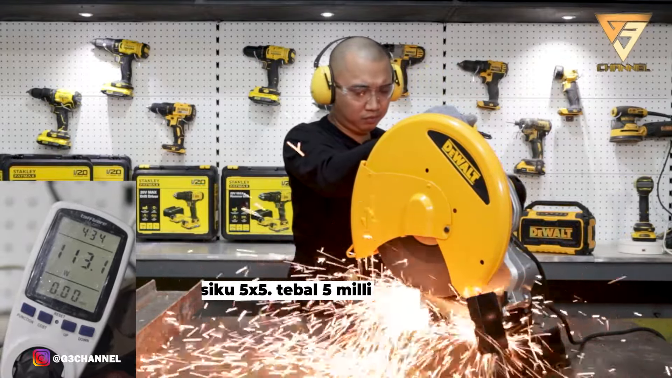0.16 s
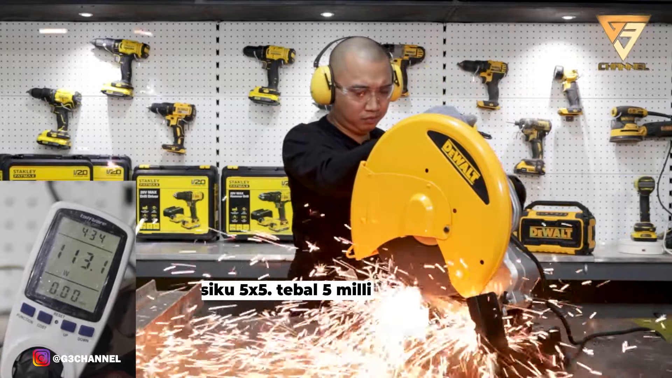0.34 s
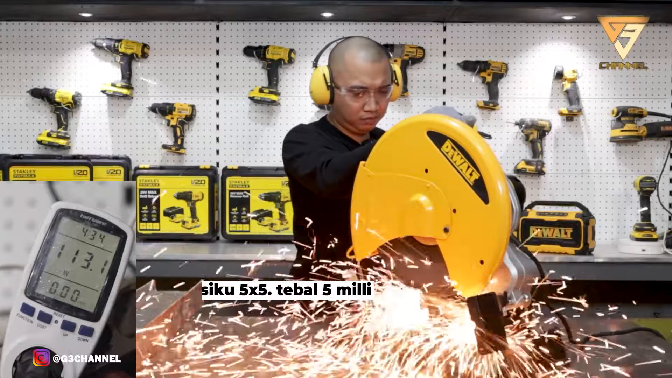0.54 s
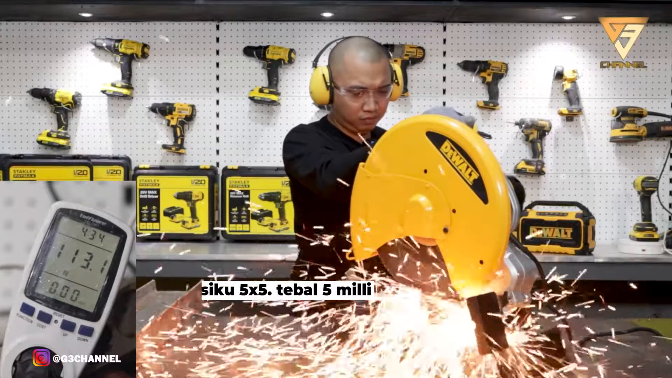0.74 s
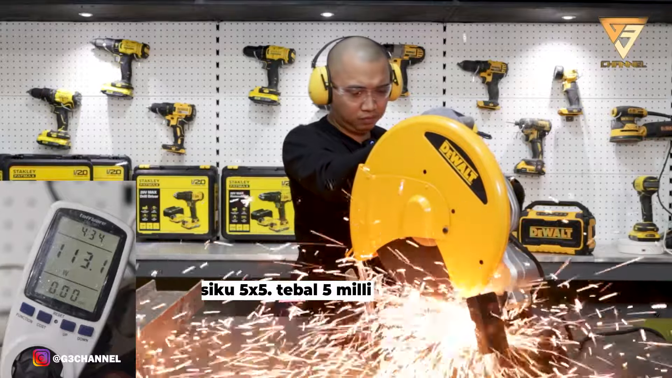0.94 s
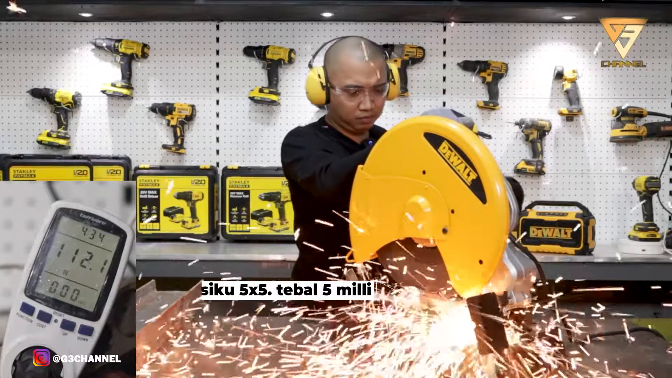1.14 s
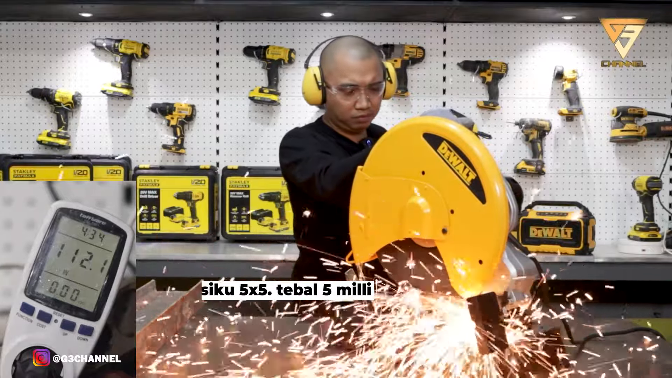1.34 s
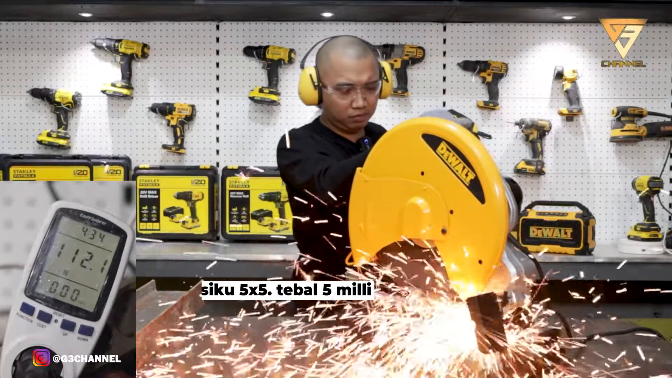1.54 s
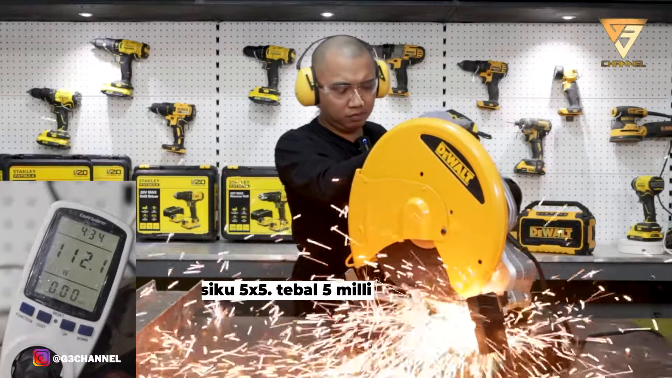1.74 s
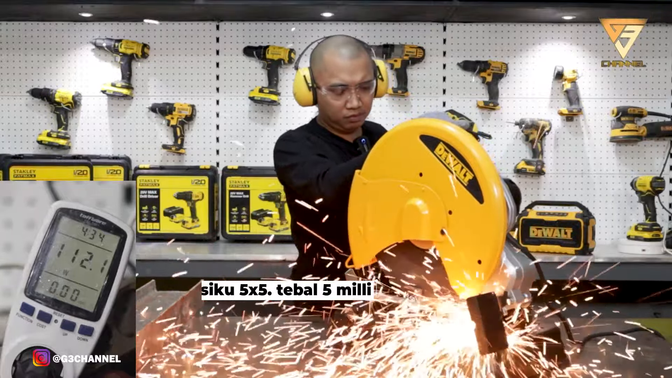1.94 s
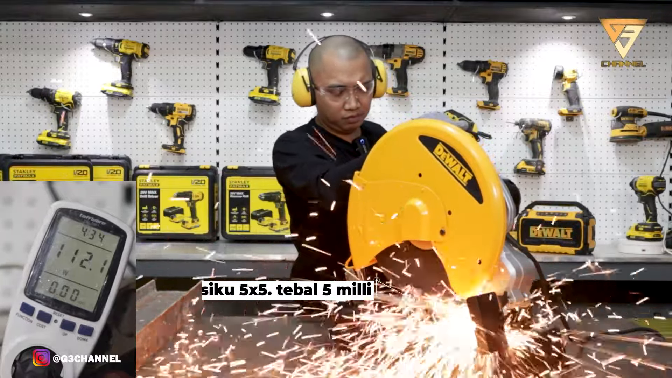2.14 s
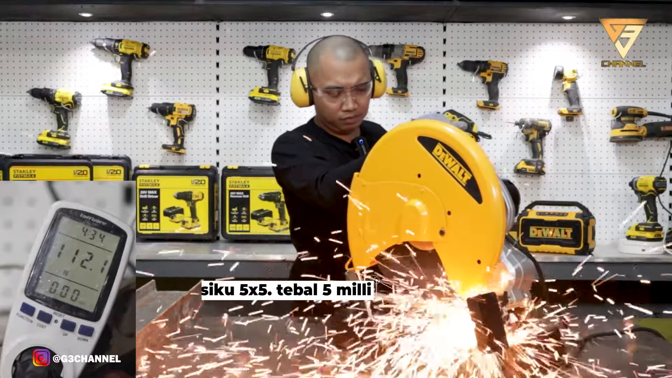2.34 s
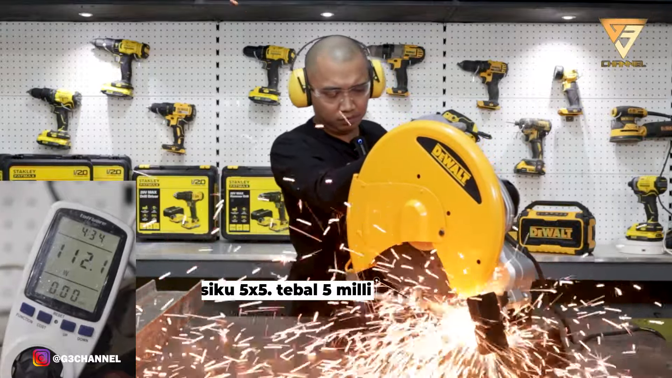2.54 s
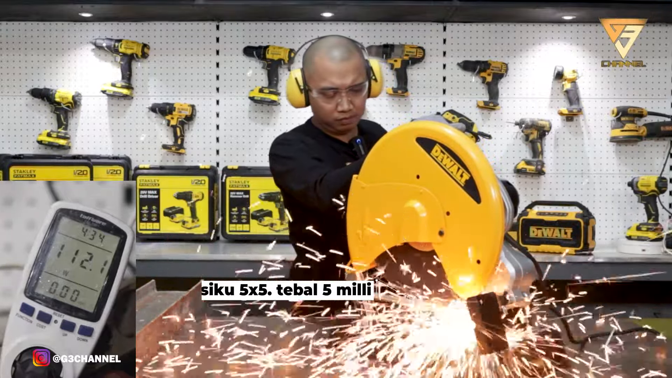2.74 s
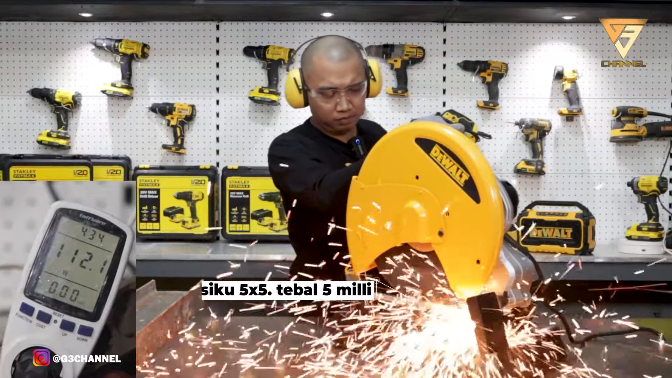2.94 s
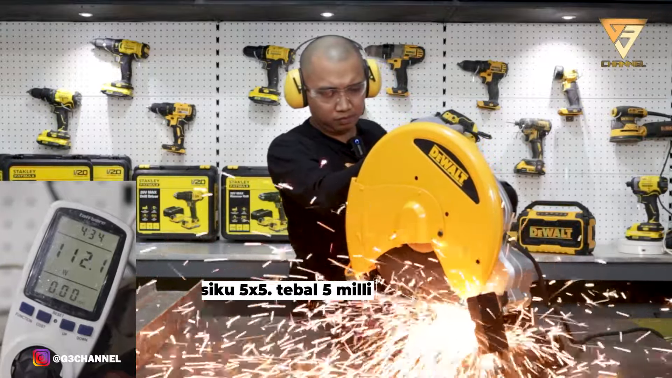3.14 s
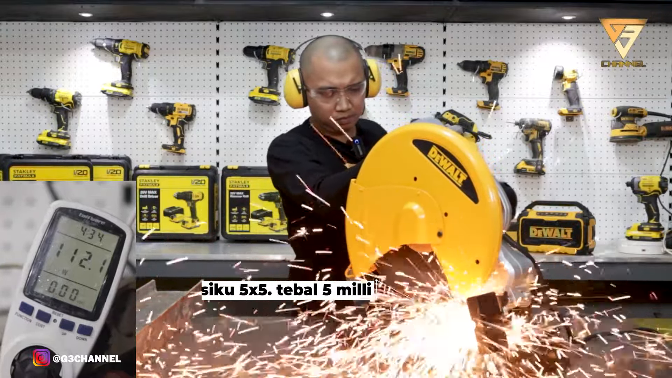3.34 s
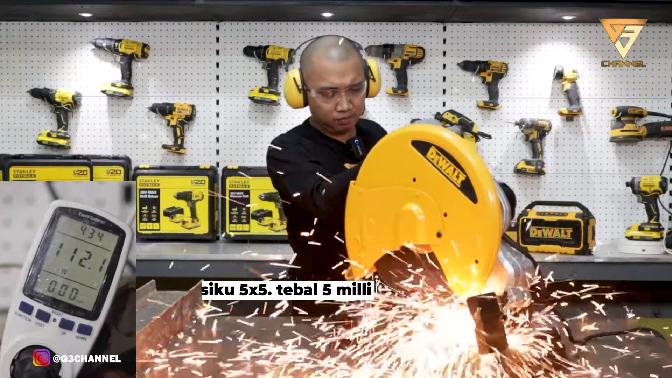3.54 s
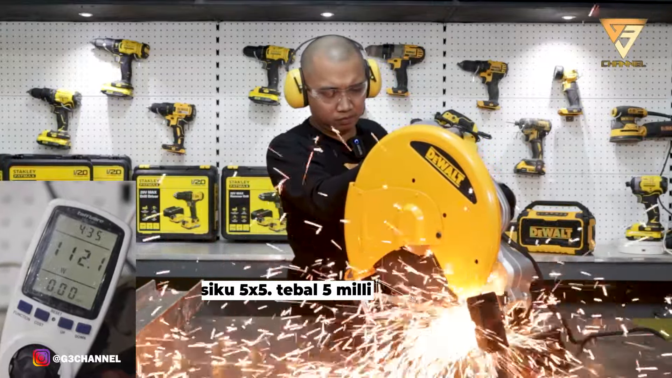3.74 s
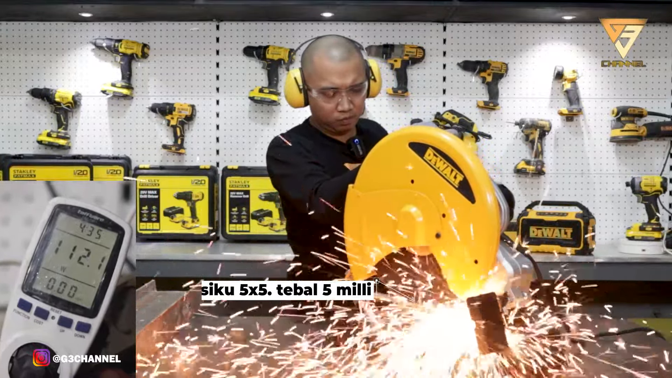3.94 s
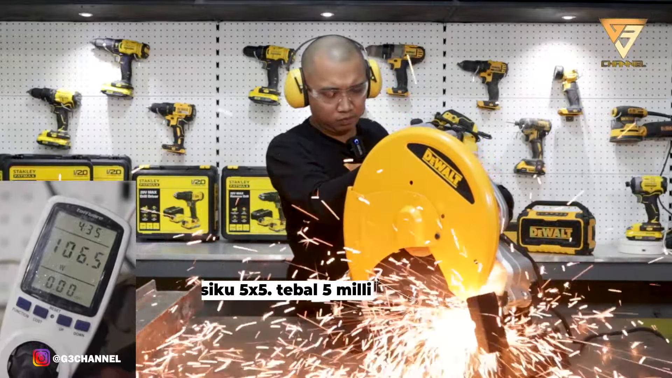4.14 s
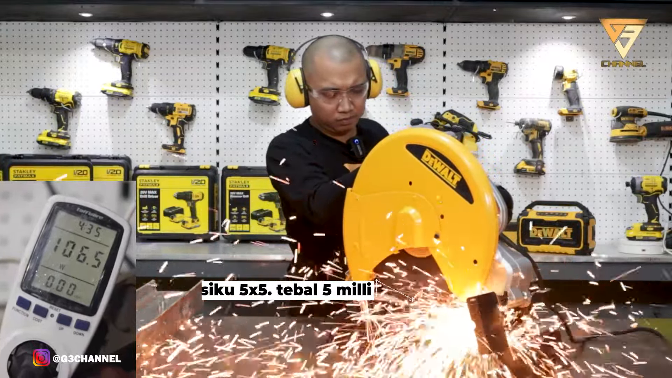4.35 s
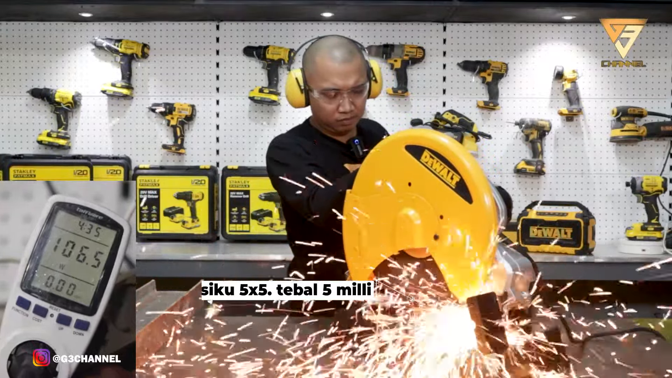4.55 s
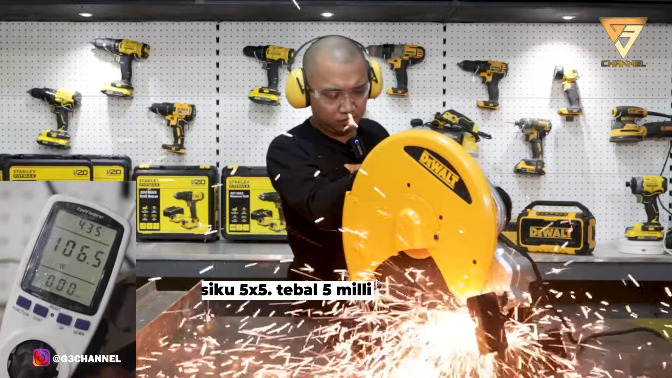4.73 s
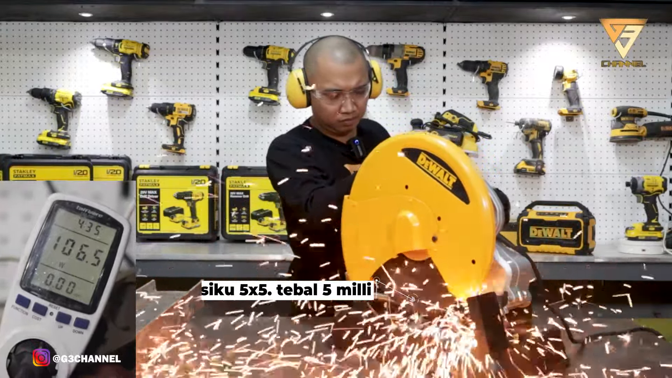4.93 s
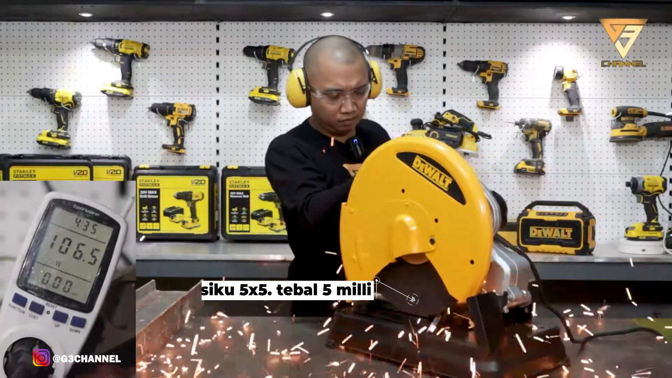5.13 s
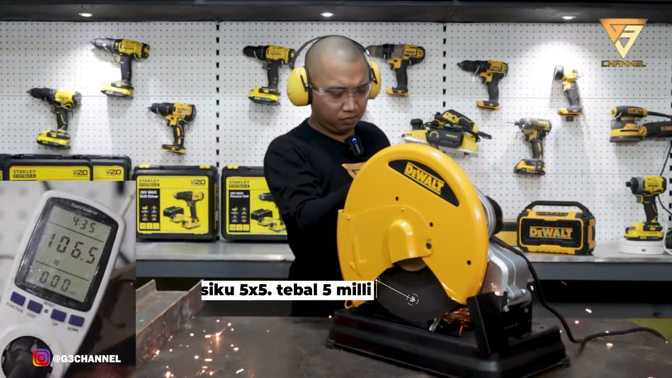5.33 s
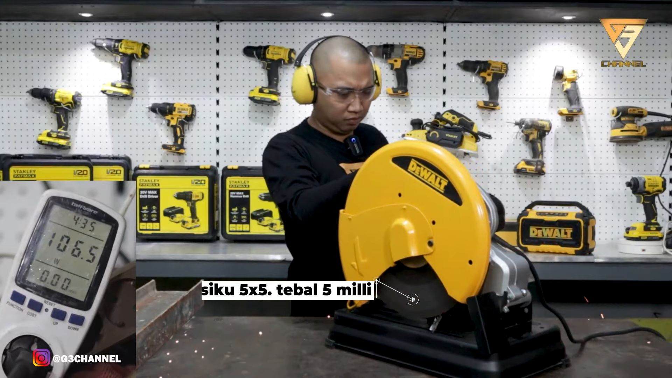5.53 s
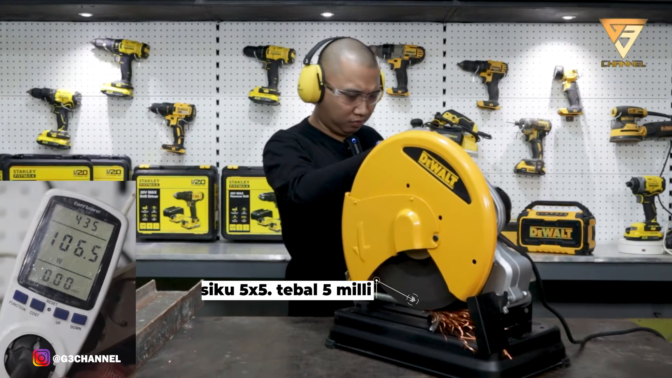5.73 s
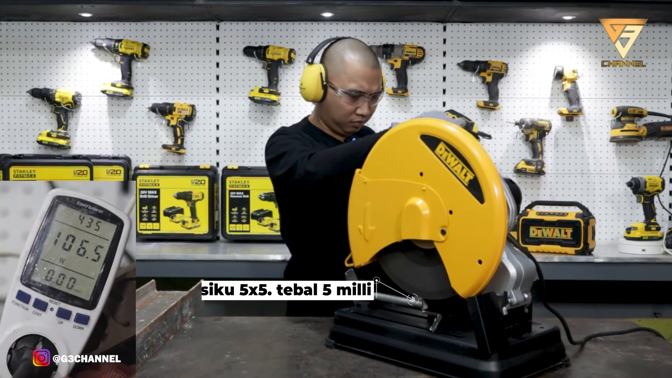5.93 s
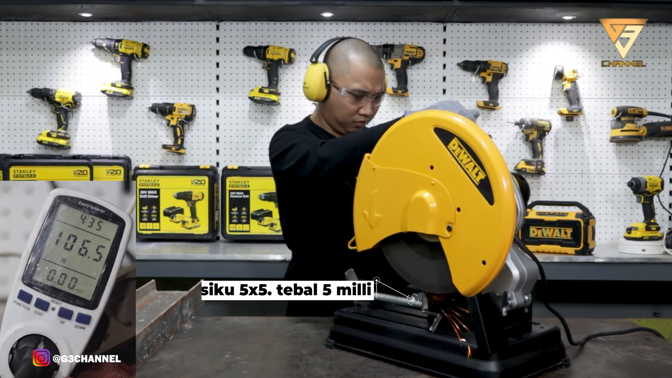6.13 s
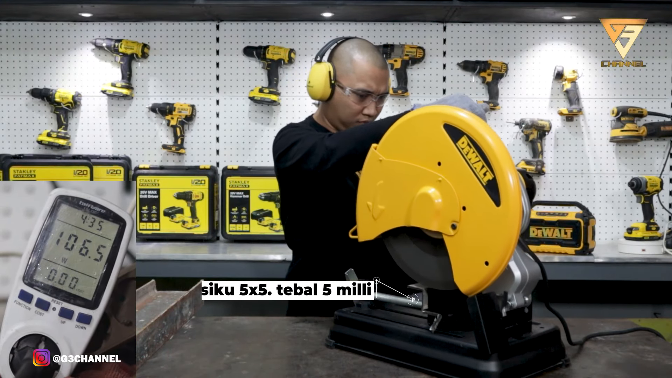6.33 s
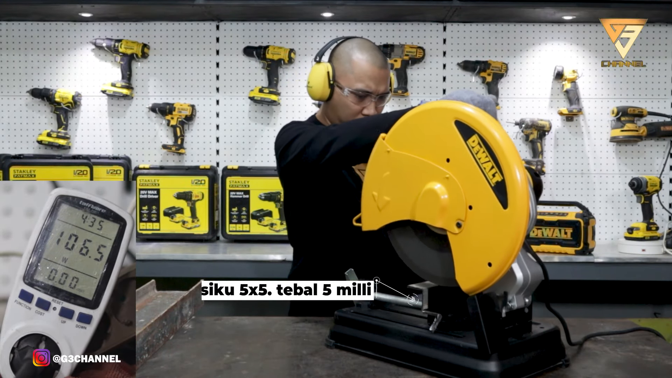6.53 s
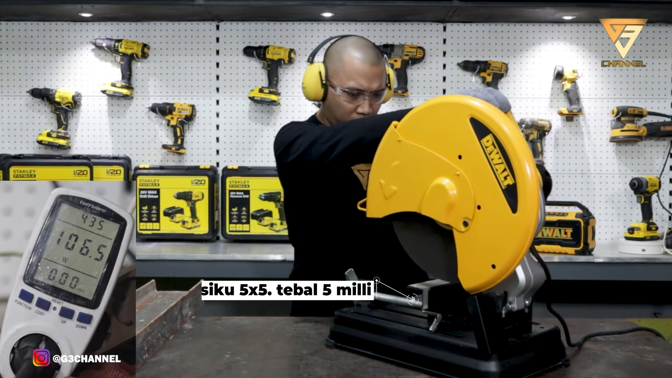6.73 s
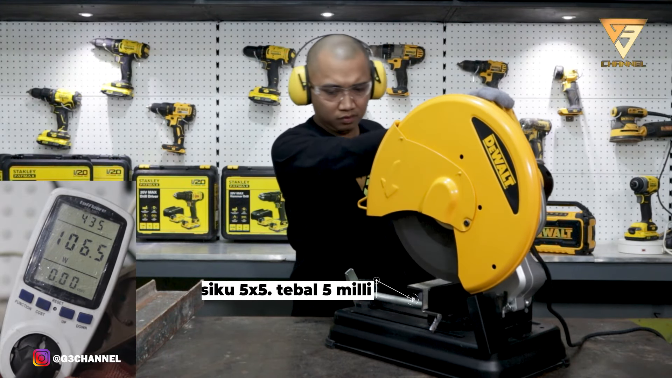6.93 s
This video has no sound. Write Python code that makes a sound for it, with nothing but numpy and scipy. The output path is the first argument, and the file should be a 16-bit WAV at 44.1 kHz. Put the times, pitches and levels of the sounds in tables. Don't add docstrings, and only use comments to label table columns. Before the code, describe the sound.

From 0 s, a chop saw is already in full cut through steel angle, loud and close in a workshop. A dense, abrasive screech with bright spark hiss throbs rapidly with each wheel turn, over a motor roar and low hum. Metallic squeals and ringing tones come and go, and the pitch rises slightly until about 3 s, then sags under load. Near 5.0 s the wheel breaks through and the grinding collapses abruptly; the motor speeds up. From about 5.25 to 6.3 s the wheel's sides scrape the cut in a fast, fluttering, bright rasp with short steel rings, strongest around 5.6 s. The motor is switched off at about 5.75 s. Scraping thins and ends with two tiny bright grazes near 6.33 s. The fan's airy whir and thin brush whine keep sinking in pitch to 7 s without stopping.

```python
import sys
import numpy as np
from scipy import signal
from scipy.fft import rfft, irfft, next_fast_len
from scipy.io import wavfile
from scipy.ndimage import uniform_filter1d

SR = 44100
rng = np.random.default_rng(int(sys.argv[2]) if len(sys.argv) > 2 else 0)


def convert_level_to_amplitude(level_db):
    exponent = np.asarray(level_db, float) / 20
    return 10 ** exponent


def store_wav(level_fs):
    pcm = np.round(np.clip(np.atleast_2d(level_fs), -1, 1) * 32767)
    wavfile.write(sys.argv[1], SR, pcm.T.astype(np.int16))


N = 307804
TIME_S = np.arange(N) / SR
BREAK_S, SWITCH_OFF_S = 5.0, 5.75


def curve(rows, before=None, after=None):
    s, *columns = np.transpose(rows)
    return [np.interp(TIME_S, s, column, left=before, right=after) for column in columns]


def unit(x):
    return x / np.sqrt(np.mean(x ** 2) + 1e-20)


def colour(x, points):
    hz, db = np.transpose(points)
    size = next_fast_len(len(x))
    grid = np.fft.rfftfreq(size, 1 / SR) + 1
    gain = convert_level_to_amplitude(np.interp(np.log(grid), np.log(hz), db))
    return irfft(rfft(x, size) * gain, size)[:len(x)]


def band(x, low_hz, high_hz):
    edges = [low_hz, min(high_hz, .45 * SR)]
    return signal.sosfilt(signal.butter(3, edges, "band", fs=SR, output="sos"), x)


def resonance(x, hz, width):
    r = np.exp(-np.pi * width / SR)
    feedback = [1, -2 * r * np.cos(2 * np.pi * hz / SR), r * r]
    return signal.lfilter([(1 - r * r) / 2, 0, (r * r - 1) / 2], feedback, x)


def with_modes(x, modes):
    return x + sum(convert_level_to_amplitude(db) * resonance(x, hz, width) for hz, width, db in modes)


def drift(rate, size=N):
    knots = rng.standard_normal(1500)
    return np.interp(np.arange(size) / SR * rate, np.arange(1500), knots)


def cosine(cycles):
    return np.cos(2 * np.pi * cycles)


# t/s, turns per second f/Hz
LOADED_SPEED = [(0, 46.05), (.5, 46.1), (.72, 46.68), (1.2, 46.75), (1.5, 47.55), (1.9, 47.55),
                (2.25, 48.0), (2.55, 48.1), (3.12, 48.92), (3.75, 47.97), (3.97, 47.97), (4.15, 47.15),
                (4.4, 46.73), (4.97, 46.58), (5.3, 50), (5.57, 51.5), (5.75, 49.78)]


def wheel_speed():
    drag_per_s = .306
    coasting_s = np.clip(TIME_S - SWITCH_OFF_S, 0, None)
    return curve(LOADED_SPEED)[0] / (1 + drag_per_s * coasting_s)


def wheel_turns():
    return np.cumsum(wheel_speed()) / SR


# t/s, once a turn level/dB, twice a turn level/dB
RUNOUT = [
    (0, 0.5, 3.5),
    (1, 0, 1),
    (1.5, 1, 1.5),
    (2.25, 2, -0.5),
    (3, 3, 2.5),
    (3.5, 1.3, 2),
    (4, 1.7, 1),
    (4.6, 2, 2),
    (4.95, 1, 3),
    (5.05, 2.5, -2),
]
# t/s, grinding level/dB, how freely the steel rings level/dB
FEED = [(0, -17, 3.5), (.5, -17, 3), (.75, -17.5, 3), (.9, -17, -1), (1.3, -17, -1), (1.75, -16, -1),
        (2.3, -16, -2), (3.1, -16, -3), (3.72, -16, -2.5), (3.82, -17.5, -1.5), (4.05, -16.5, 0.5),
        (4.5, -18.5, 3.5), (5.018, -16, 1.5), (5.054, -22, 3), (5.126, -20, -9), (5.25, -26, -6)]
# f/Hz, width f/Hz, level/dB
STEEL_MODES = [(4400, 160, -14), (6950, 210, -8), (8650, 800, -4.5), (9540, 200, -0.5), (10330, 230, 1),
               (11500, 300, -9.5), (12660, 260, -12)]
# f/Hz, level/dB per Hz
GRIND_COLOUR = [(88, -53), (150, -31), (296, -11), (552, -3), (632, -12), (724, 3), (1030, -2),
                (1770, -3.5), (2240, -9), (2460, -3), (3170, -9.5), (5800, -10.5), (8720, -1),
                (12900, -2.5), (15600, -5.5)]


def grinding(turns):
    once_db, twice_db = curve(RUNOUT)
    skewed_turns = turns + .04 * cosine(2 * turns - .09)
    throb_db = once_db * cosine(turns - .06) + twice_db * cosine(2 * skewed_turns - .09)
    turns = turns + .00006 * drift(20)
    grit = cutting_noise(turns)
    body = colour(with_modes(grit, STEEL_MODES), GRIND_COLOUR)

    def part(low_hz, high_hz):
        level = np.std(band(body, max(low_hz, 1000), high_hz))
        return band(body, low_hz, high_hz) / level

    high_db, ring_db = curve(FEED, after=-90)
    low_db = high_db - 8.5 + 0.56 * ring_db - 1.1 * TIME_S
    low_mid_db = high_db - 10.0 + ring_db
    mid_db = high_db - 9.5 + 0.39 * ring_db + 0.1 * TIME_S
    low = convert_level_to_amplitude(low_db - 2.5 + 0.25 * throb_db) * part(152, 1870)
    low_mid = convert_level_to_amplitude(low_mid_db - 0.5 + 0.23 * throb_db) * part(2050, 3800)
    mid = convert_level_to_amplitude(mid_db + 1.27 + 0.27 * throb_db) * part(4190, 7060)
    high = convert_level_to_amplitude(high_db - 1.7 + throb_db) * part(6620, 14060)
    tones = convert_level_to_amplitude(throb_db) * ridges(turns) + convert_level_to_amplitude(0.55 * throb_db) * singing(grit)
    return low + low_mid + mid + high + tones


def cutting_noise(turns):
    biting = curve([(5.0, 1), (5.06, .1)])[0]
    sparks = np.sqrt(1.07 - biting ** 2) * rng.standard_normal(N)
    grit = biting * rim(turns, kept=.94, uneven_db=.7) + sparks
    lost_share, top_hz = .45, 950
    shudder = np.sqrt(1 - (1 - lost_share) ** 2) * rng.standard_normal(N) - lost_share * grit
    return grit + biting * colour(shudder, [(top_hz, 0), (1.3 * top_hz, -40)])


def rim(turns, kept, uneven_db, size=720):
    fresh = rng.standard_normal((400, size))
    worn = signal.lfilter([1], [1, -np.clip(kept, 0, .99)], fresh, axis=0)[40:]
    strength = rng.standard_normal((360, size // 2 + 1))
    for _ in range(2):
        strength = uniform_filter1d(strength, size=20, axis=0)
    strength = uniform_filter1d(strength, size=2, axis=1)
    fade_in = np.clip(np.arange(size // 2 + 1) / 40, 0, 1)
    worn = irfft(rfft(worn) * convert_level_to_amplitude(uneven_db * unit(strength) * fade_in), size).ravel()
    fine = signal.resample_poly(worn, 4, 1)
    return unit(np.interp(turns * size * 4, np.arange(len(fine)), fine))


# start t/s, length t/s, ridges per turn
FINE_RIDGES = [(0, .44, 132), (.23, .5, 196), (.8, .63, 253), (1.56, .4, 263), (1.56, .4, 188),
               (1.6, .42, 177), (1.6, .5, 216), (1.64, .4, 140), (1.64, .46, 208), (1.94, .37, 139),
               (2.02, .37, 179), (2.11, 1.85, 216), (2.7, .6, 259), (2.3, .5, 145), (2.85, .53, 173),
               (3.35, .78, 145), (3.64, .53, 178), (4.1, .37, 140), (4.27, .5, 213)]
# start t/s, length t/s, ridges per turn, extra level/dB
COARSE_RIDGES = [(0, .4, 54, 2), (0, .5, 52, 0), (0, .6, 37, -6), (0, .8, 28, -6), (0, .55, 51, -2),
                 (0, .3, 63, -1), (.02, .6, 93, 2), (.19, .42, 76, 1), (.4, .5, 44, -1), (.6, .25, 19, 2),
                 (.6, .75, 62, -2), (1.25, .35, 36, -1), (1.35, 1.04, 94, 1), (1.55, .55, 26, -1),
                 (2.3, .6, 15, -3), (2.19, .5, 76, -3), (2.85, .35, 25, 0), (3.0, .7, 53, -3),
                 (3.55, .45, 15, -2), (3.59, .45, 37, -2), (3.65, .45, 27, -2), (3.7, .5, 34, 0),
                 (3.89, .7, 104, 3), (4.05, .55, 89, 1), (4.1, .5, 62, 0), (4.2, .7, 25, -5)]
# start t/s, ridges per turn
WEB_RIDGES = [
    (4.22, 190),
    (4.31, 152),
    (4.52, 39),
    (4.61, 61),
    (4.61, 80),
    (4.62, 107),
    (4.62, 115),
    (4.75, 35),
]


def ridges(turns):
    out = np.zeros(N)
    body_hz, body_db = np.transpose(GRIND_COLOUR)
    rows = [(s, s + length, k, 0) for s, length, k in FINE_RIDGES]
    rows += [(s, s + length, k, db) for s, length, k, db in COARSE_RIDGES]
    rows += [(s, BREAK_S, k, 2) for s, k in WEB_RIDGES]
    for start, end, per_turn, extra_db in rows:
        hz = per_turn * 47.5
        db = -30 + extra_db + 0.54 * np.interp(hz, body_hz, body_db) + 1.14 * np.log2(hz / 4000)
        span = slice(round(max(start - .08, 0) * SR), round((end + 0.11) * SR))
        size = span.stop - span.start
        early = round(.2 * SR) * (start == 0)
        swell = signal.windows.tukey(size + early, .55)[early:] * convert_level_to_amplitude(db)
        for step, share_db in zip(range(-2, 3), [-15.5, -10.5, 2, -8.0, -16]):
            waver = convert_level_to_amplitude(share_db + 2.2 * drift(11, size=size))
            cycles = (per_turn + step) * turns[span] + 0.15 * drift(12.6, size=size) + rng.random()
            out[span] += swell * waver * np.sin(2 * np.pi * cycles)
    return out


# start t/s, length t/s, f/Hz, level/dB
SINGING_MODES = [(0, 0.26, 11180.0, -35), (0, 0.47, 9900, -34), (0, 0.56, 4060, -33), (0, 0.55, 5350, -36),
                 (0, 0.6, 12080.0, -33), (0, 0.62, 14360.0, -37), (0, 0.92, 14150.0, -40),
                 (0, 1.11, 7800, -36), (0, 1.33, 11330, -35), (0.22, 0.65, 8980, -28.5),
                 (0.62, 0.72, 9900, -33), (0.91, 0.37, 11900, -33), (0.98, 0.66, 8040, -36),
                 (1.38, 0.7, 11020.0, -36), (1.42, 1.2, 6010.0, -40), (1.47, 1.3, 4840.0, -40),
                 (1.48, 0.72, 13890.0, -40), (1.53, 0.44, 8180.0, -37), (1.62, 0.6, 9630, -32),
                 (2.02, 0.8, 4240, -42), (2.02, 0.75, 12500, -38), (2.14, 0.82, 5570, -42),
                 (2.2, 0.59, 11150.0, -32), (2.3, 0.58, 6700, -33), (2.62, 0.44, 13670.0, -38),
                 (2.68, 0.77, 6130, -36), (2.76, 0.67, 7880.0, -32), (3.02, 0.46, 7190.0, -34),
                 (3.1, 1.3, 2840, -41), (3.13, 0.52, 10010.0, -34), (3.18, 0.51, 13630.0, -36),
                 (3.25, 0.81, 12680.0, -34), (3.28, 0.97, 8280, -33), (3.31, 1.71, 12140.0, -36),
                 (3.35, 1.11, 12100, -36), (3.36, 0.69, 13100, -36), (3.5, 0.49, 5430.0, -39),
                 (3.5, 0.63, 14530.0, -43), (3.6, 0.46, 6030.0, -41), (3.61, 0.56, 13600, -40),
                 (3.65, 0.45, 11330.0, -36), (3.69, 0.8, 14170.0, -42), (3.71, 0.39, 3330, -38),
                 (4.066, 0.54, 9730.0, -36), (4.22, 0.76, 10750, -38), (4.37, 0.43, 3940, -44),
                 (4.54, 0.49, 4900, -39), (4.68, 0.41, 3340, -33)]


def singing(grit):
    out = np.zeros(N)
    width_hz = 67
    for s, length, hz, db in SINGING_MODES:
        end_s = min(s + length, BREAK_S + 0.046)
        span = slice(round(s * SR), round(end_s * SR))
        ring = unit(resonance(resonance(grit[span], hz, width_hz), hz, 3 * width_hz))
        out[span] += convert_level_to_amplitude(db + 1) * ring * signal.windows.tukey(len(ring), .5)
    return out


# t/s, swing level/dB, lead of the contact in cycles
WOBBLE = [
    (5.2, 1, -.06),
    (5.35, 3.6, -.1),
    (5.45, 4, -.09),
    (5.55, 3, .07),
    (5.75, 3.6, .27),
    (5.85, 1.5, .33),
    (5.95, 2, .28),
    (6.15, 5, .33),
    (6.3, 4, .33),
]
# t/s, level/dB
RUB = [
    (5.24, -26.5),
    (5.408, -17.5),
    (5.632, -16),
    (5.814, -17.5),
    (5.838, -21),
    (5.876, -17),
    (6.062, -23.5),
    (6.196, -25.5),
    (6.31, -31),
]
# f/Hz, level/dB per Hz
SCRAPE_COLOUR = [(1760, -22.5), (3000, -8.5), (3190, -20), (4010, -8.5), (5430, -18), (5780, -10),
                 (7510, -4.5), (8990, -0.5), (11700, -3.5), (14200, -9), (15600, -26)]


def rubbing(turns):
    swing_db, lead = curve(WOBBLE)
    hiss = unit(colour(rng.standard_normal(N), SCRAPE_COLOUR))
    gate_db = swing_db * cosine(2 * turns + lead) + 1.0 * drift(60)
    scrape = convert_level_to_amplitude(curve(RUB, before=-90, after=-87)[0] - 2.5 + gate_db) * hiss
    return scrape + edge_rings(hiss, gate_db) + grain_flecks(hiss, gate_db) + last_touches(hiss)


# t/s, length t/s, f/Hz, level/dB
EDGE_RINGS = [(4.98, .08, 13900, -33), (5.0, 0.16, 8800, -28), (5.118, 0.085, 4920, -27),
              (5.122, .07, 6020, -30), (5.125, .06, 6850, -26), (5.128, 0.079, 7900, -25),
              (5.14, .06, 10100, -27), (5.297, 0.15, 8670, -21), (5.38, .13, 11500, -21),
              (5.39, .14, 10900, -27), (5.397, 0.37, 1633, -27), (5.4, .1, 13000, -33),
              (5.43, 0.38, 9200, -30), (5.52, .1, 9800, -33), (5.63, .15, 12700, -34),
              (6.1, .17, 10150, -31), (5.9, .15, 13200, -34), (5.5, 0.11, 11200, -32),
              (5.59, .1, 10700, -23), (5.62, .2, 12500, -33), (5.64, .22, 8040, -25),
              (5.643, 0.1, 11300, -22), (5.66, 0.3, 8750, -24), (5.865, .11, 9700, -25),
              (5.87, .03, 10800, -24), (6.08, .1, 11000, -28), (6.2, 0.2, 770, -29.5), (6.3, .1, 524, -32),
              (6.28, .7, 1710, -33.5), (6.82, .16, 1580, -32)]


def edge_rings(hiss, gate_db):
    out = np.zeros(N)
    for s, length, hz, db in EDGE_RINGS:
        span = slice(round(s * SR), round((s + length) * SR))
        width_hz = 45 + .026 * hz
        ring = unit(resonance(resonance(hiss[span], hz, width_hz), hz, 3 * width_hz))
        swell = signal.windows.tukey(len(ring), 0.6)
        out[span] += convert_level_to_amplitude(db + 1.5 * gate_db[span] - 4.0) * ring * swell
    return out


def grain_flecks(hiss, gate_db):
    out = np.zeros(N)
    rub_db = curve(RUB, before=-90, after=-83)[0]
    first_s, last_s = RUB[0][0], RUB[-1][0]
    for when, pitch, size in rng.random((150, 3)):
        start = round((first_s + when * (last_s - first_s)) * SR)
        span = slice(start, start + round(.07 * (.5 + size) * SR))
        ring = unit(resonance(hiss[span], 7800 * 1.7 ** pitch, 150))
        out[span] += convert_level_to_amplitude(-20 + rub_db[span] + gate_db[span]) * ring * np.hanning(len(ring))
    return out


# t/s, level/dB, rise t/s
LAST_TOUCH = [
    (6.323, -24, 0.0031),
    (6.338, -17, 0.0025),
]


def last_touches(hiss):
    out = np.zeros(N)
    bright = unit(band(hiss, 9000, 15500))
    for s, db, rise_s in LAST_TOUCH:
        age = np.clip(TIME_S - s, 0, 1)
        out += convert_level_to_amplitude(db) * np.e * age / rise_s * np.exp(-age / rise_s) * bright
    return out


def motor(turns):
    dying = 1 - np.exp(-np.clip(TIME_S - SWITCH_OFF_S, 0, None) / 0.25)
    noise = fan_roar(dying) + frame_rumble(dying)
    return noise + brush_whine(turns) + gears(turns) + unbalance(turns) + buzz(turns)


# t/s, level/dB
ROAR = [(0, -28), (.75, -27.5), (.9, -27), (2.1, -28), (3.3, -25.5), (3.93, -27.5), (4.26, -25),
        (5.07, -28), (5.17, -25.5), (5.7, -25.5), (5.8, -27), (6.98, -27)]
# f/Hz, level/dB per Hz
FAN_COLOUR = [(15, -61), (25, -62), (380, -13), (511, -3.5), (687, -5.5), (1060, -5), (1420, -7),
              (1720, -7.5), (2250, -8), (3280, -12), (4400, -14.5), (6600, -14), (7550, -16), (9880, -11),
              (15600, -25.5)]
# f/Hz, width f/Hz, level/dB
HOUSING_MODES = [(563.4, 14, 0), (724, 21, 2), (1820, 280, -5), (3510, 100, -0.5), (10300, 1500, -1)]
# t/s, level/dB
DRAUGHT = [
    (5.0, -4.5),
    (6.2, 5.5),
    (6.45, -1.5),
    (6.7, -1.5),
    (6.98, -8),
]
# f/Hz, level/dB
UNPOWERED_COLOUR = [(1600, -1.5), (1720, 3.5), (1850, -2), (3700, -1.5), (4800, -5.5), (6500, -3.5),
                    (13000, -7), (14800, -12)]


def fan_roar(dying):
    air = colour(with_modes(rng.standard_normal(N), HOUSING_MODES), FAN_COLOUR)
    air = air + (convert_level_to_amplitude(curve(DRAUGHT)[0]) - 1) * band(air, 7900, 13400)
    air = air + dying * (colour(air, UNPOWERED_COLOUR) - air)
    return convert_level_to_amplitude(curve(ROAR)[0] - 2.5) * air / np.std(band(air, 300, 1047))


def frame_rumble(dying):
    return convert_level_to_amplitude(-54 - 13 * dying) * unit(band(rng.standard_normal(N), 89, 277))


# t/s, level/dB
WHINE = [
    (5.05, -40),
    (5.55, -41),
    (5.78, -33),
    (6.0, -39),
    (6.23, -43),
    (6.27, -37),
    (6.55, -39),
    (6.98, -39),
]


def brush_whine(turns):
    bars_per_turn = 178.6
    whine_db = curve(WHINE)[0] + 3.8 * drift(70)
    angle = 2 * np.pi * bars_per_turn * turns + .8 * drift(130)
    return convert_level_to_amplitude(whine_db) * np.sqrt(2) * (np.sin(angle) + convert_level_to_amplitude(-22) * np.sin(2 * angle))


# middle t/s, length t/s, cycles per turn, level/dB
GEAR_TONES = [(0, 1.6, 2, -56), (0, 2.6, 5, -45), (2.8, 6, 5, -48), (.5, 1.8, 17, -38), (3.1, 2, 14, -39),
              (3.5, .6, 17, -38), (0.3, 1.4, 6, -51), (1.2, 1.8, 9, -41), (4.9, .7, 5, -45),
              (4.9, .8, 9, -41), (5.58, .55, 6.2, -38), (5.55, .5, 3, -50), (6.2, .25, 6.2, -48)]


def gears(turns):
    out = np.zeros(N)
    for middle, length, per_turn, db in GEAR_TONES:
        swell = np.cos(np.pi * np.clip((TIME_S - middle) / length, -.5, .5)) ** 2
        out += convert_level_to_amplitude(db + 2.0 * drift(6.3)) * swell * np.sin(2 * np.pi * per_turn * turns)
    return out


# t/s, level/dB
SHAKE = [(0, -68), (1.2, -59), (2.6, -61), (3.1, -56), (4.8, -58), (5.07, -53), (5.3, -63), (5.46, -56),
         (5.62, -73), (6.2, -63), (6.98, -69)]


def unbalance(turns):
    return convert_level_to_amplitude(curve(SHAKE)[0] + 4.0) * np.sin(2 * np.pi * turns)


def buzz(turns):
    mains_hz = 99.89
    idle = np.clip((TIME_S - BREAK_S) / 0.29, 0, 1)
    mains_off = np.clip((TIME_S - SWITCH_OFF_S) / .2, 0, 1)
    mains = convert_level_to_amplitude(-59 + 8 * idle - 20 * mains_off) * cosine(mains_hz * TIME_S - .22)
    speed = wheel_speed()
    speed_change_hz = np.clip(speed - 47, 0, 2.1) + np.clip(speed - 42.5, None, 0)
    twice = convert_level_to_amplitude(-61 + 3.5 * speed_change_hz) * cosine(2 * turns + .15)
    return mains + twice


def scene():
    turns = wheel_turns()
    mono = grinding(turns) + rubbing(turns) + motor(turns)
    return np.array([mono, mono])


# t/s, f/Hz
PATCHES = [(.03, 10100), (.147, 8900), (.146, 14400), (.263, 8900), (.308, 6100), (.378, 8260),
           (.468, 10200), (.5, 10200), (.542, 13100), (.96, 6950), (.984, 8900), (.982, 4600),
           (2.189, 7600), (2.19, 11600), (2.19, 14500), (3.63, 7500), (3.63, 6050), (3.63, 15000),
           (4.117, 5800), (5.188, 13800), (6.535, 5000), (6.538, 11100), (6.95, 5750), (6.945, 13000)]


def patches(sound):
    out, white = np.zeros(N), rng.standard_normal(N)
    for s, hz in PATCHES:
        span = slice(round(s * SR), round((s + 0.038) * SR))
        edges = [(hz - 850, -90), (hz - 800, 0), (hz + 800, 0), (hz + 850, -90)]
        level = convert_level_to_amplitude(-1.5) * np.std(colour(sound[span], edges))
        noise = level * unit(colour(white[span], edges))
        out[span] += noise * np.hanning(len(noise))
    return out


def band_limit(x):
    return signal.sosfilt(signal.butter(12, 15770, fs=SR, output="sos"), x)


def record(dry):
    power = dry ** 2
    bent = dry + .12 * (power - uniform_filter1d(power, size=300))
    mix = 0.85 * np.tanh(bent / 0.84) + patches(dry[0]) * [[1], [-1]]
    return band_limit(mix)


dry = scene()
out = record(dry)
store_wav(out)
```